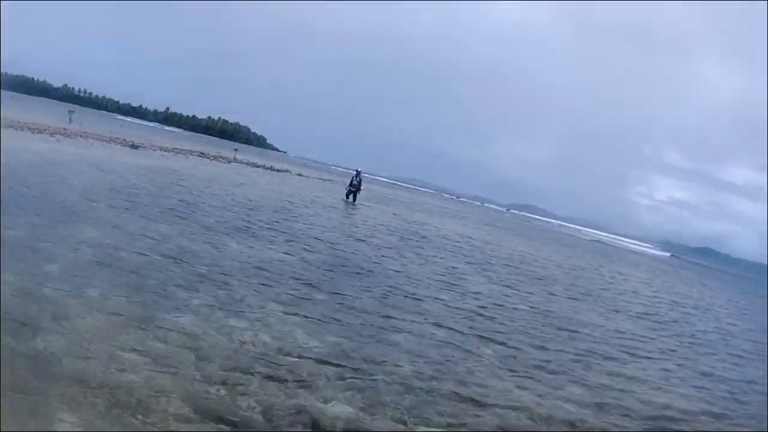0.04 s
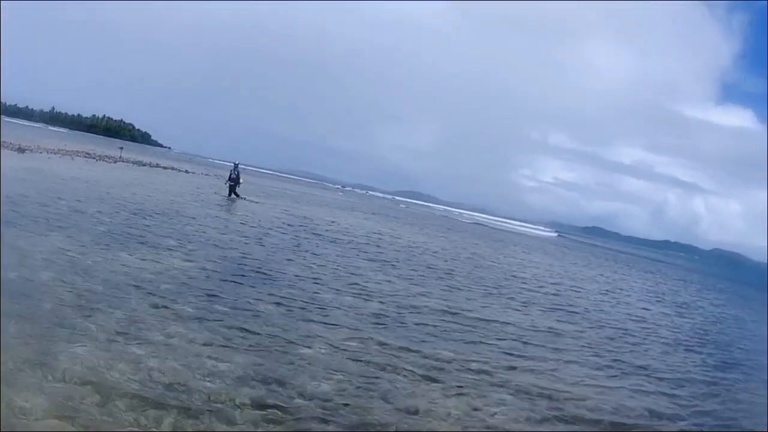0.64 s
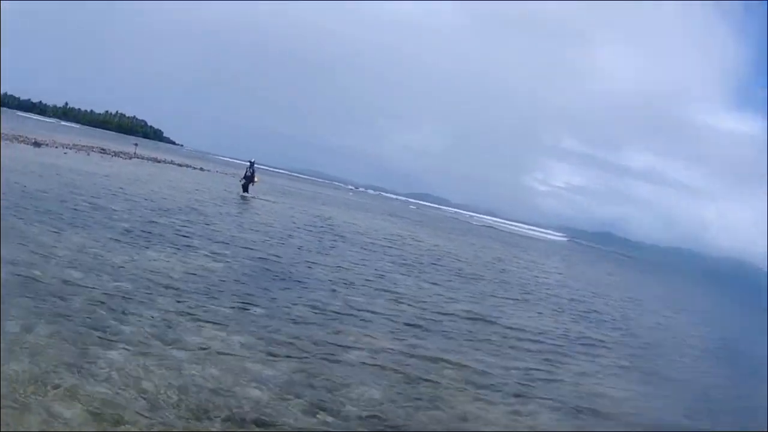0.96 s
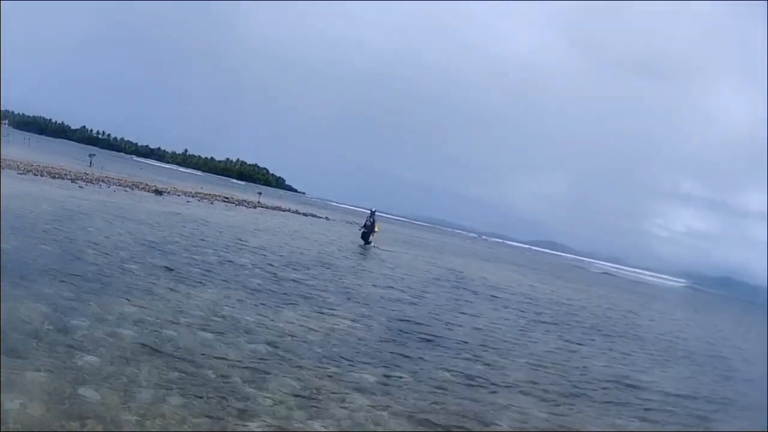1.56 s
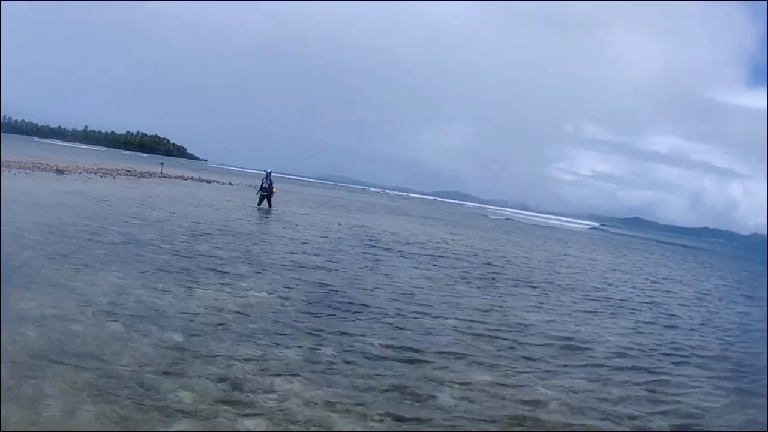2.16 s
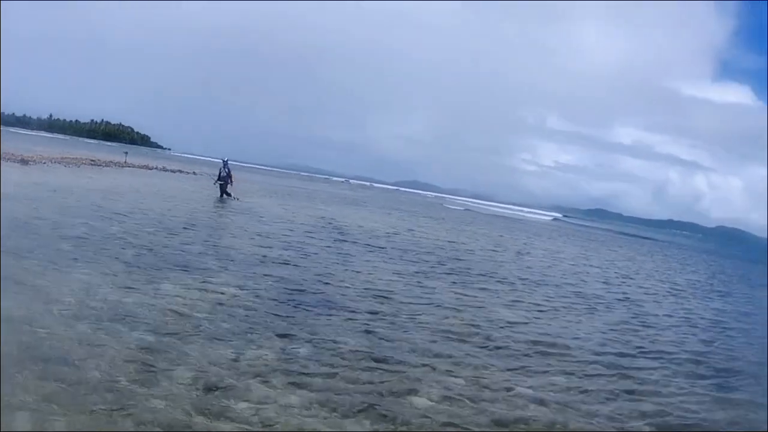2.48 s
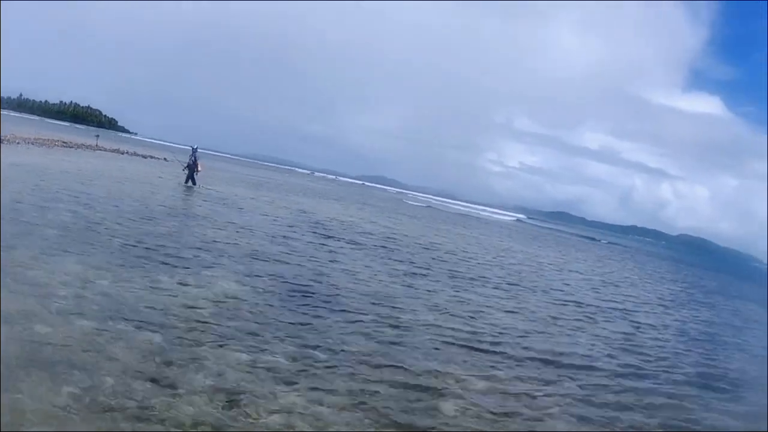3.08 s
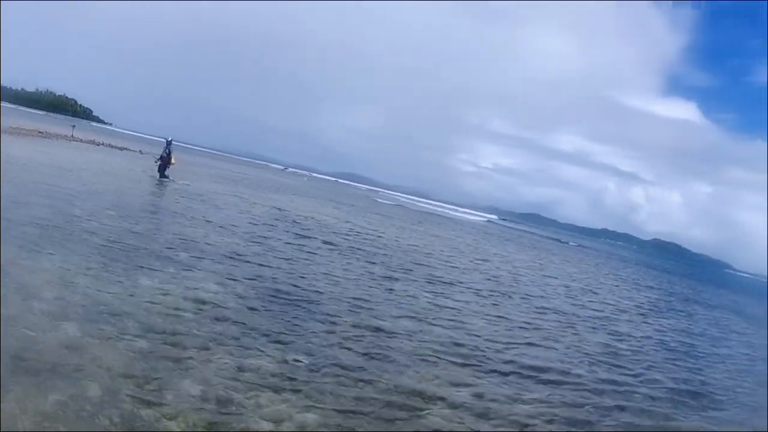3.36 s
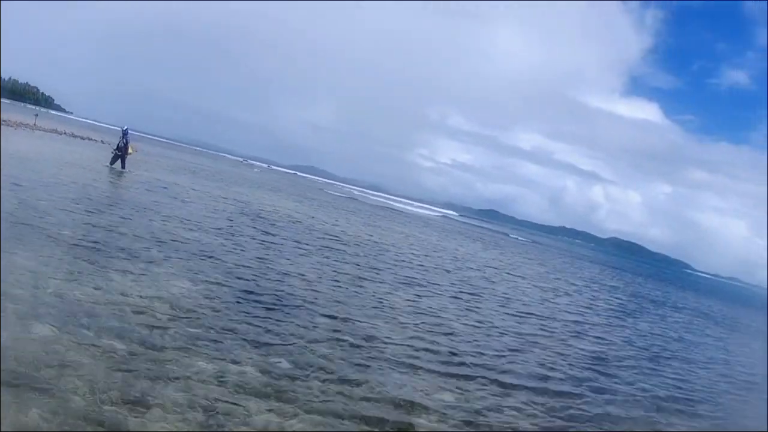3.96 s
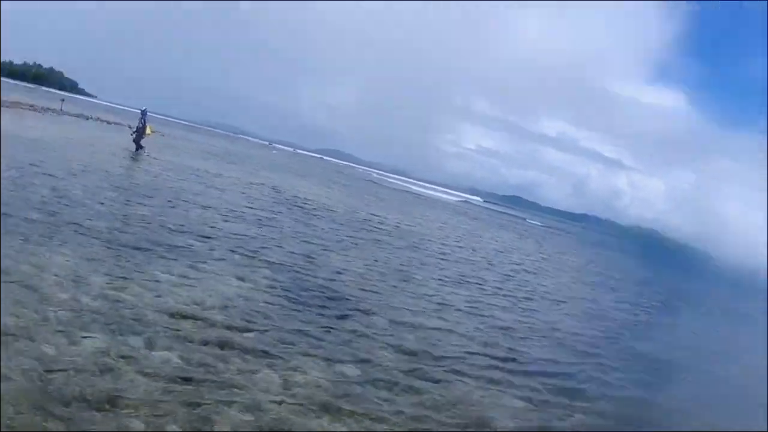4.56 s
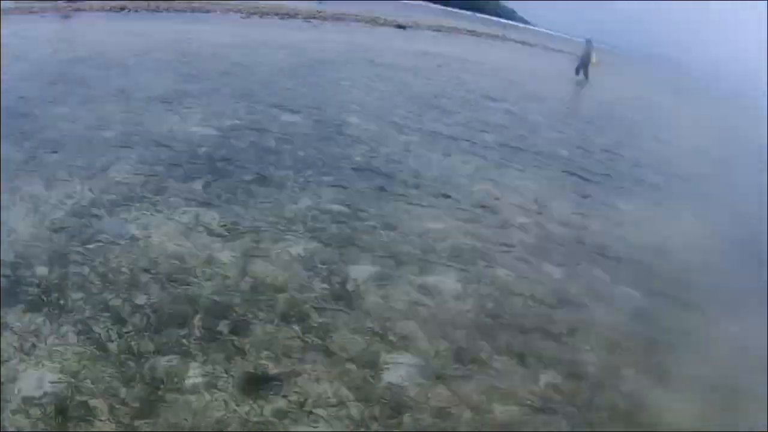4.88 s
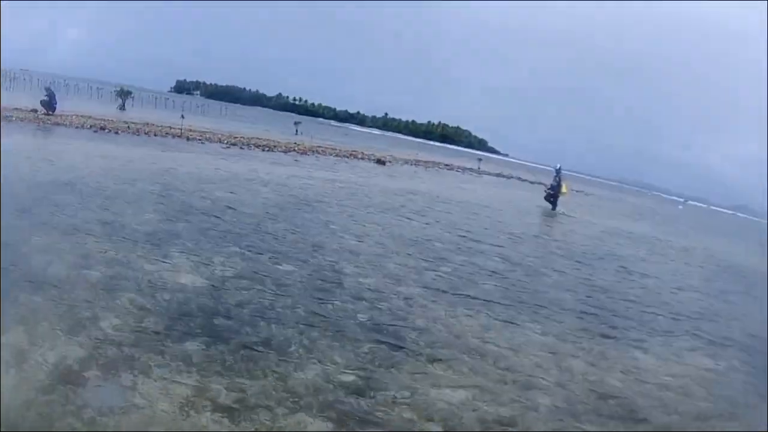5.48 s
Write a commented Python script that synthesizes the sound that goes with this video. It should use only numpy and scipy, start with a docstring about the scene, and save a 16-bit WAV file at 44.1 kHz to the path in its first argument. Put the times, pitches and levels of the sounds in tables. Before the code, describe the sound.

Hollow sloshing and small plops of someone walking through shallow water, with soft sea wash and wind buffeting the microphone.

```python
"""Wading through shallow seawater

Heard from a camera in a waterproof housing: each stride churns the water and pushes up a slosh
of ringing bubbles, then spray, drips and a few plops fall back. The housing's resonances colour
the water. Behind it are the wash of the sea, low wind rumble on the case and a steady hiss."""
import sys
import numpy as np
from scipy.fft import rfft, irfft, next_fast_len
from scipy.io import wavfile
from scipy.ndimage import uniform_filter1d, map_coordinates

SR = 44100
rng = np.random.default_rng(int(sys.argv[2]) if len(sys.argv) > 2 else 0)


def wav_out(sig):
    """Save sig, one row per channel (or a flat mono array), as 16-bit PCM at SR to the path in sys.argv[1]."""
    wavfile.write(sys.argv[1], SR, np.round(np.clip(np.atleast_2d(sig).T, -1, 1) * 32767).astype(np.int16))


N = 247842


def amp(db):
    """Decibels to gain."""
    return 10 ** (np.asarray(db) / 20)


def unit(x):
    """x at rms 1."""
    return x / np.sqrt(np.mean(x ** 2) + 1e-20)


def together(gains):
    """Level of unrelated sounds heard at once: their powers add."""
    return np.sqrt(sum(g ** 2 for g in gains))


def shape(points, hz):
    """EQ curve: gain through (frequency [Hz], level [dB]) points on a log axis."""
    freqs, db = np.transpose(points)
    return amp(np.interp(np.log(hz + 1), np.log(freqs), db))


def curves(rows):
    """Automation: one value per sample for each column after the time."""
    times, *columns = np.transpose(rows)
    return [np.interp(np.arange(N) / SR, times, column) for column in columns]


def wobble(rate):
    """A smooth random curve, rate knots a second."""
    knots = rng.standard_normal(int(N * rate / SR) + 4)
    return map_coordinates(knots, [np.arange(N) * rate / SR])


def swell(start, hold, rise, fall):
    """Envelope that climbs to 1 at start, holds, then dies away; rise and fall in dB per s."""
    t = np.arange(N) / SR - start
    return amp(-rise * np.maximum(-t, 0) - fall * np.maximum(t - hold, 0))


def coloured(x, gain):
    """x through the minimum-phase filter with the given gain over frequency."""
    size = 2 * next_fast_len(N // 2 + 8192)
    response = np.maximum(gain(np.fft.rfftfreq(size, 1 / SR)), 1e-6)
    cepstrum = irfft(np.log(response), size)
    cepstrum[1:size // 2] *= 2  # folded forward, so ringing only follows a sound
    cepstrum[size // 2 + 1:] = 0
    return irfft(rfft(x, size) * np.exp(rfft(cepstrum)), size)[:N]


def noise(spectrum):
    """Noise of rms 1 with the given spectrum."""
    return unit(coloured(rng.standard_normal(N), lambda hz: shape(spectrum, hz)))


def housing(hz, leak_db=-21, leak_hz=900):
    """Gain of the case: its walls pass their own resonances, and some of the low end."""
    # resonances of the housing: (frequency [Hz], width [Hz], level [dB])
    modes = [(897, 218, -2.5), (1430, 119, 4), (1720, 99, -12), (2170, 230, -16.5), (3178, 123, -8),
             (3523, 204, -8.5), (4370, 1350, -19)]
    ringing = sum(amp(db) ** 2 * (hz * width) ** 2 / ((centre ** 2 - hz ** 2) ** 2 + (hz * width) ** 2)
                  for centre, width, db in modes)
    leak = amp(leak_db) ** 2 / (1 + (hz / leak_hz) ** 4)
    return np.sqrt(ringing + leak)


def housed(x, spectrum):
    """x shaped by a spectrum and heard through the housing; rms 1."""
    return unit(coloured(x, lambda hz: shape(spectrum, hz) * housing(hz)))


def bubble(t, hz, cycles, rise):
    """A soft-edged ring that fades 60 dB in cycles / hz seconds and bends up as the bubble surfaces."""
    age = t * hz / cycles
    attack = 1 - np.exp(-2 * t * hz)
    bend = 1 + rise * np.minimum(age, 1) / 2
    return amp(-60 * age) * attack * np.sin(2 * np.pi * hz * t * bend)


def froth(spectrum, rate, hz, spread, cycles, scatter_db, rush_db):
    """A cloud of rate bubbles a second over the rush of the water, through the housing; rms 1."""
    count = int(rate * N / SR)
    start, faintness = rng.random((count, 2)).T
    pitch = np.clip(hz * np.exp(spread * rng.standard_normal(count)), 200, 12000)
    gain = amp(-scatter_db * np.log(faintness + 0.034))  # a few loud, many faint
    samples = np.arange(700)
    rings = gain[:, None] * bubble(samples / SR, pitch[:, None], cycles, rise=0.25)
    positions = (start * N).astype(int)[:, None] + samples
    cloud = np.bincount(positions.ravel(), rings.ravel())[:N]
    rush = rng.standard_normal(N)
    return unit(housed(cloud, spectrum) + amp(rush_db) * housed(rush, spectrum))


def turbulence(spectrum, span):
    """Noise levelled over span seconds, so that its swells come from the envelope put on it."""
    x = noise(spectrum)
    power = np.abs(uniform_filter1d(x ** 2, int(span * SR)))
    return x / np.sqrt(power + 1e-6)


def sea(level_db=-47):
    """The bed: a steady wash of ripples and far surf on the reef."""
    # tone of the wash: (frequency [Hz], level [dB])
    wash_eq = [(100, 2.5), (250, 4), (600, 6.5), (900, -1.5), (1400, -14.5), (1900, 0.5), (2700, -11.5),
               (3400, 0), (4200, -6), (7000, -19), (15000, -20)]
    wash = housed(rng.standard_normal(N), wash_eq)
    return amp(level_db + 0.7 * wobble(5.4)) * wash


def wind(gust_half_s=0.022):
    """Eddies buffet the microphone, and the case booms at its lowest resonance."""
    # wind on the housing: (time [s], boom level [dB])
    breeze = [(0, -41), (.2, -36.5), (.48, -39), (.62, -33), (.8, -34), (1.0, -38.5), (1.2, -43.5),
              (1.9, -35), (2.22, -41), (2.55, -38.5), (3.08, -36), (3.5, -38.5), (3.95, -37), (4.1, -33.5),
              (4.65, -37.5), (4.98, -48.5), (5.42, -34.5), (5.62, -46)]
    # brief gusts that thump the housing: (time [s], boom level [dB])
    gusts = [(0.035, -31), (0.335, -29), (0.665, -26), (1.05, -32), (1.3, -32.5), (1.92, -31), (3.09, -33),
             (4.27, -33), (5.15, -36), (5.39, -33.5)]
    # slow eddies at the microphone port: (time [s], buffet level [dB])
    eddies = [(0, -41), (.5, -49), (.66, -42), (.78, -45), (1.05, -42), (1.25, -49), (1.45, -40),
              (1.7, -47), (1.92, -39), (2.2, -51), (2.75, -54), (2.86, -40), (3.02, -36), (3.3, -46),
              (3.7, -52), (4.12, -40), (4.5, -48), (4.67, -42), (4.82, -52), (5.35, -44), (5.62, -49)]
    # tone of the boom and of the deeper buffet: (frequency [Hz], level [dB])
    boom_eq = [(30, -22.5), (55, -33), (72, -8.5), (88, -2), (99, -1), (116, -9), (145, -16), (200, -26),
               (300, -38), (700, -64.5)]
    buffet_eq = [(10, -12), (25, -2.5), (45, 1.5), (62, 4.5), (85, -20), (150, -35), (400, -73)]
    boom_db, = curves(breeze)
    buffet_db, = curves(eddies)
    t = np.arange(N) / SR
    thumps = [amp(db) * np.exp(-((t - at) / gust_half_s) ** 2 / 2) for at, db in gusts]
    boom = together([amp(boom_db + 1.7 * wobble(18)), *thumps]) * turbulence(boom_eq, span=0.0616)
    buffet = amp(buffet_db + 2.2 * wobble(9)) * turbulence(buffet_eq, span=0.17)
    return boom + buffet


def showers():
    """Envelope of the thrown water that falls back after the strides."""
    # bursts of falling water: (time [s], hold [s], level [dB])
    bursts = [(0.0, 0.13, -52.5), (0.436, .05, -52), (0.6, 0.07, -50), (0.883, .18, -52.5),
              (1.908, 0.16, -45.5), (2.797, 0.19, -54.5), (3.933, .08, -50), (4.833, 0.23, -43.5),
              (5.337, 0.059, -47)]
    return together(amp(db) * swell(at, hold, rise=170, fall=168) for at, hold, db in bursts)


def spray(drizzle_db=-58.5):
    """Fine drops patter down in showers over a faint drizzle, more open when the camera faces them."""
    # the camera dips towards the legs: (time [s], share of spray arriving head-on [0-1])
    tilt = [(0, .2), (2, .16), (2.9, .4), (4.65, 0.07), (4.82, 1), (5.62, 0.65)]
    # tone of the spray from the side and head-on: (frequency [Hz], level [dB])
    side_eq = [(1200, -33), (2000, 4), (2600, -5), (3000, 6), (3500, 3), (5000, -1), (7000, 6),
               (11000, -22), (16000, -35)]
    front_eq = [(1200, -30), (1900, -10.5), (2350, 3.5), (2800, -2), (3400, -0.5), (4300, 1.5), (5200, 1.5),
                (7000, 0), (11000, -15), (16000, -27)]
    level = together([amp(drizzle_db), showers()])
    facing = np.clip(curves(tilt)[0], 0, 1)
    side = froth(side_eq, rate=900, hz=3354, spread=0.298, cycles=29, scatter_db=3.5, rush_db=-4.5)
    front = froth(front_eq, rate=900, hz=3260, spread=0.33, cycles=11, scatter_db=5, rush_db=0.5)
    flicker = amp(1.1 * wobble(60))
    return level * flicker * (np.sqrt(1 - facing) * side + np.sqrt(facing) * front)


def drips(cycles=45):
    """Small drops each trap one tiny, high bubble."""
    # small drops close by: (time [s], level [dB], pitch [Hz])
    drops = [(0.8873, -33, 3320), (2.9218, -35, 3450), (3.0034, -41, 3260), (2.027, -31, 3250),
             (3.915, -35, 3130), (5.075, -31, 3400)]
    out, t = np.zeros(N + SR), np.arange(2048) / SR
    for at, db, hz in drops:
        out[int(at * SR):][:len(t)] += amp(db) * bubble(t, hz, cycles, rise=0.1)
    return out[:N]


def plops(cycles=26, slap_db=4, slap_t60=0.026, slap_hz=3200, trim_db=-2.2):
    """A drop slaps the surface and leaves a ringing bubble."""
    # large bubbles and falling drops: (time [s], peak before trim [dB], pitch [Hz], slap offset [dB])
    drops = [(0.321, -28.5, 1420, -15), (0.951, -29.5, 1380, -12), (1.784, -20, 1320, -22),
             (2.025, -22.5, 1660, -11), (2.741, -26.5, 1410, -9), (2.827, -21, 1410, -12),
             (3.002, -29.5, 1350, 7), (3.429, -28.5, 778, -7), (3.884, -30, 751, -20),
             (3.947, -29, 1520, -16), (4.744, -20.5, 1420, -31), (5.074, -21, 1560, -18),
             (5.559, -31, 820, -13)]
    out, t = np.zeros(N + SR), np.arange(2048) / SR
    freqs = np.fft.rfftfreq(len(t), 1 / SR)
    muffle = np.sqrt(housing(freqs)) / (1 + (freqs / slap_hz) ** 2)
    for at, db, hz, offset_db in drops:
        burst = unit(irfft(rfft(rng.standard_normal(len(t))) * muffle))
        slap = burst * amp(-60 * t / slap_t60) * (1 - np.exp(-t * hz))
        plop = bubble(t, hz, cycles, rise=0.037) + amp(slap_db + offset_db) * slap
        out[int(at * SR):][:len(t)] += amp(db + trim_db) * plop / np.abs(plop).max()
    return out[:N]


def stirring(lap_slosh_db=-51.5, lap_gurgle_db=-54.5, lap_churn_db=-45.5, lap_hz=937):
    """Slosh, gurgle and churn gains and bubble pitch: pushes and falling water add to steady lapping."""
    # a leg pushes through the water:
    # (time [s], hold [s], rise [dB/s], slosh [dB], gurgle [dB], churn [dB], target pitch [Hz])
    strides = [(0.0, 0.14, 47, -41.5, -46.5, -45, 963), (0.645, .035, 55, -37.5, -41, -36, 940),
               (0.86, 0.11, 62, -51, -47.5, -46.5, 920), (1.283, 0.029, 88, -47.5, -51, -43.5, 1020),
               (1.795, .06, 42, -34.5, -41.5, -37, 1012), (2.547, 0.061, 200, -49, -45, -47.5, 980),
               (2.768, 0.1, 50, -46.5, -45.5, -44, 900), (3.844, 0.2, 29, -49.5, -46.5, -49, 840),
               (4.71, 0.02, 113, -39, -42, -52, 890), (4.83, 0.026, 152, -32.5, -40.5, -55, 810),
               (4.955, .02, 150, -41.5, -46.5, -59, 850), (5.322, 0.024, 75, -38, -49, -48, 850),
               (5.395, 0.016, 200, -45, -47, -56, 840)]
    falling = showers()  # falling water makes bubbles too
    sloshes = [together([amp(lap_slosh_db), falling])]
    gurgles = [amp(lap_gurgle_db), amp(1) * falling]
    churns, pitches = [amp(lap_churn_db)], [lap_hz]
    for at, hold, rise, slosh_db, gurgle_db, churn_db, hz in strides:
        push = swell(at, hold, rise, fall=72)  # the water calms after each push
        sloshes.append(amp(slosh_db) * push)
        gurgles.append(amp(gurgle_db) * push)
        churns.append(amp(churn_db) * push)
        pitches.append(hz)
    slosh = together(sloshes)
    pitch_hz = sum(hz * (gain / slosh) ** 2 for hz, gain in zip(pitches, sloshes))  # the loudest leads
    return slosh, together(gurgles), together(churns), pitch_hz


def wading(large_hz=830, small_hz=1080):
    """Each leg churns the water and folds air into it; the smaller the bubbles, the higher they ring."""
    # tone of the low churn, large and small slosh bubbles and finer gurgle: (frequency [Hz], level [dB])
    churn_eq = [(70, -28), (125, 5), (165, 7), (220, 0.5), (310, -1), (430, -5), (620, -7.5), (900, -17),
                (2000, -42.5)]
    large_eq = [(200, -29), (450, 8), (650, -0.5), (800, 5.5), (950, 4.5), (1100, -11), (1400, -25),
                (4000, -56)]
    small_eq = [(300, -38), (700, -14), (880, -8), (1000, 8), (1180, 4), (1320, 4.5), (1600, -31.5),
                (4000, -50)]
    gurgle_eq = [(600, -45), (1100, -7.5), (1300, -2.5), (1500, -6.5), (1950, -1.5), (2400, -4.5),
                 (4000, -44)]
    slosh_gain, gurgle_gain, churn_gain, pitch_hz = stirring()
    spurts = wobble(40)  # the bow wave breaks unevenly
    churn = churn_gain * amp(1.1 * spurts) * noise(churn_eq)
    large = froth(large_eq, rate=640, hz=831, spread=0.21, cycles=22, scatter_db=4.5, rush_db=-1.5)
    small = froth(small_eq, rate=700, hz=1065, spread=0.17, cycles=23, scatter_db=3.5, rush_db=-1.5)
    fine = froth(gurgle_eq, rate=700, hz=1504, spread=0.2, cycles=18.7, scatter_db=4.5, rush_db=-4.5)
    crossfade = np.pi / 2 * np.clip((pitch_hz - large_hz) / (small_hz - large_hz), 0, 1)
    slosh = slosh_gain * amp(1.1 * spurts) * (np.cos(crossfade) * large + np.sin(crossfade) * small)
    gurgle = gurgle_gain * amp(1.2 * spurts) * fine
    return churn + slosh + gurgle


def scene():
    """Water and wind in mono, at one microphone."""
    return (wading() + spray() + plops() + drips() + sea() + wind())[None]


def record(dry, hiss_db=-48.5, top_hz=15550):
    """The camera adds flat hiss and keeps nothing above its band limit."""
    noisy = dry + amp(hiss_db) * rng.standard_normal(dry.shape)
    size = next_fast_len(N + SR // 2)
    passband = np.fft.rfftfreq(size, 1 / SR) < top_hz
    return irfft(rfft(noisy, size) * passband, size)[:, :N]


dry = scene()
out = record(dry)
wav_out(out)
```